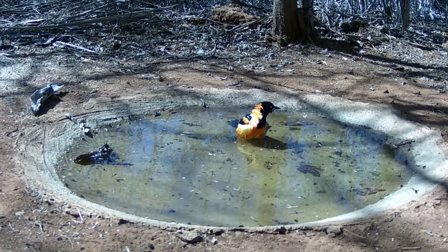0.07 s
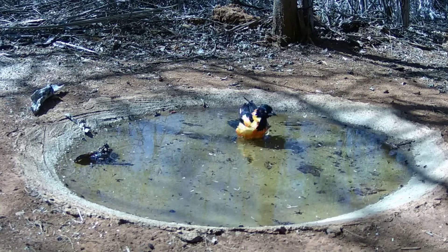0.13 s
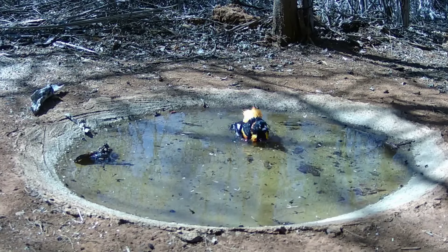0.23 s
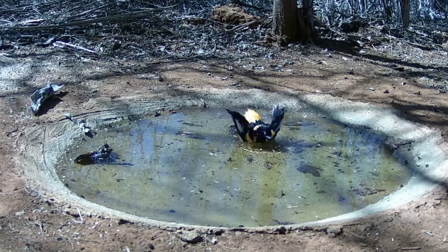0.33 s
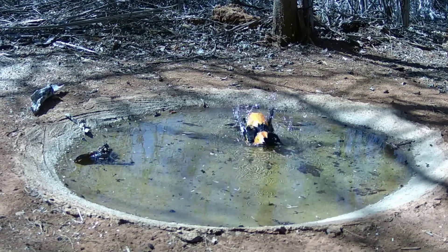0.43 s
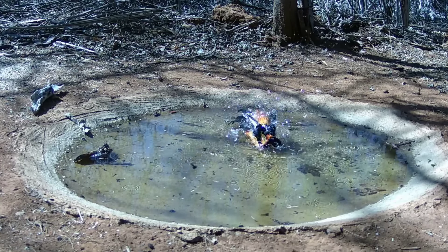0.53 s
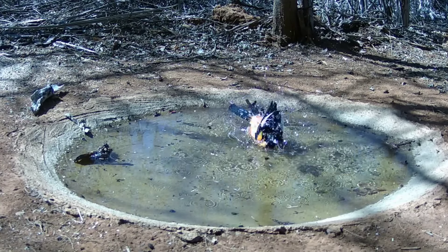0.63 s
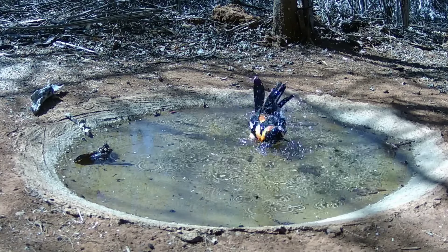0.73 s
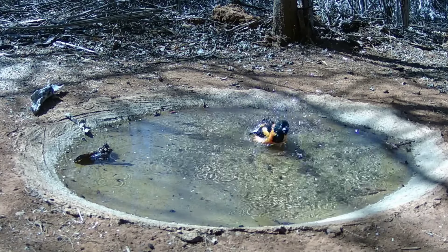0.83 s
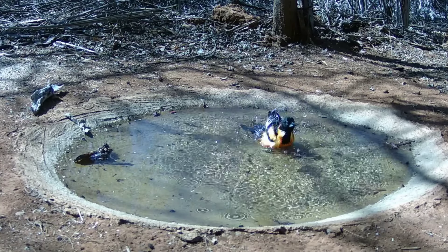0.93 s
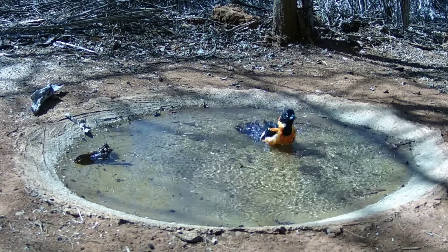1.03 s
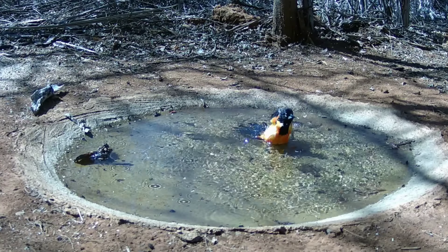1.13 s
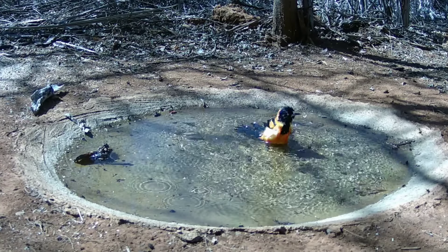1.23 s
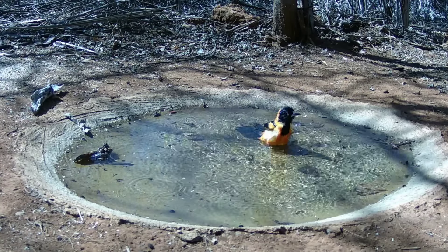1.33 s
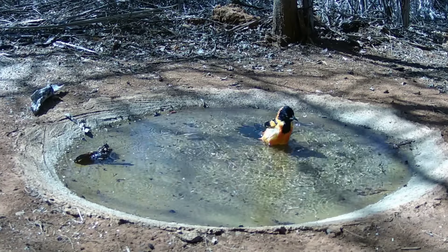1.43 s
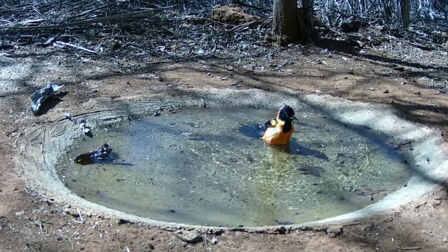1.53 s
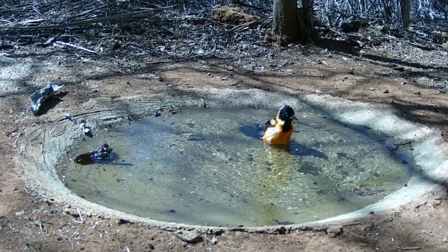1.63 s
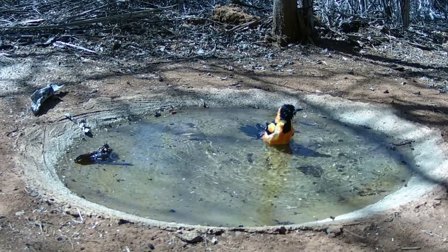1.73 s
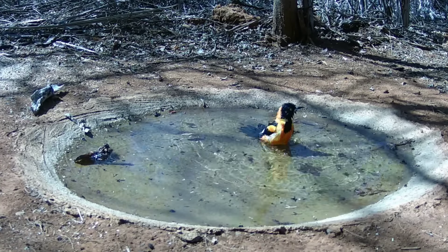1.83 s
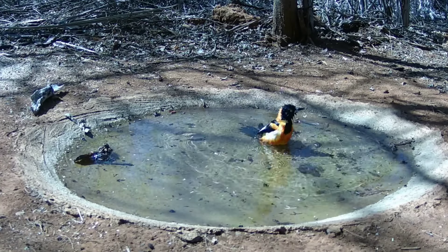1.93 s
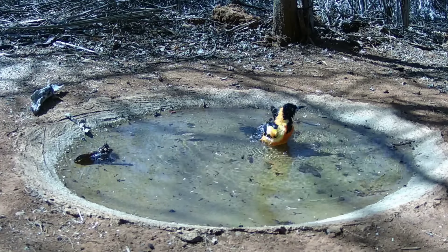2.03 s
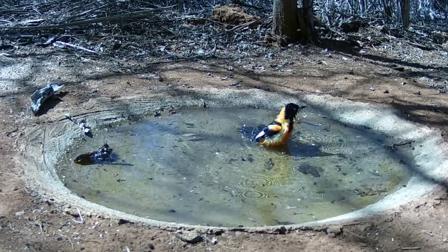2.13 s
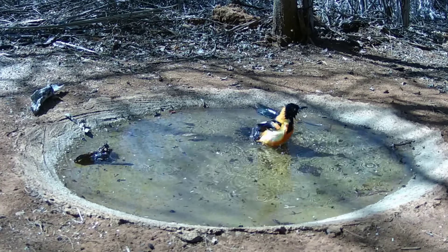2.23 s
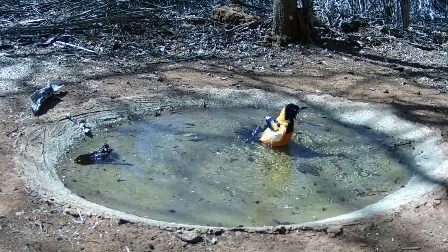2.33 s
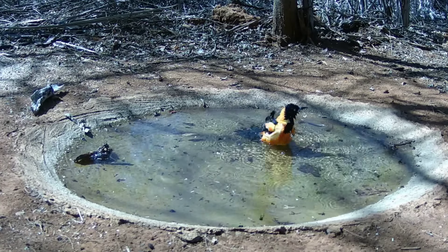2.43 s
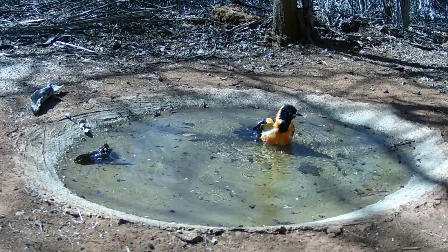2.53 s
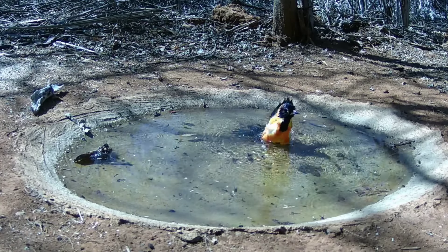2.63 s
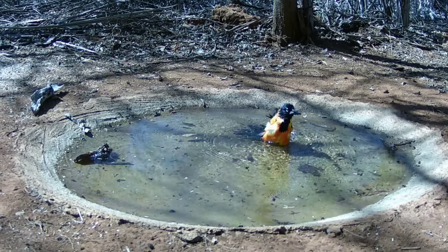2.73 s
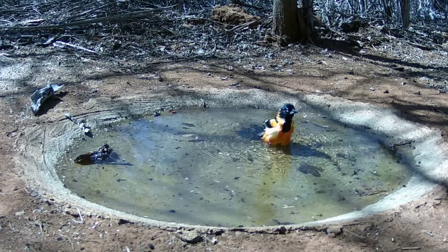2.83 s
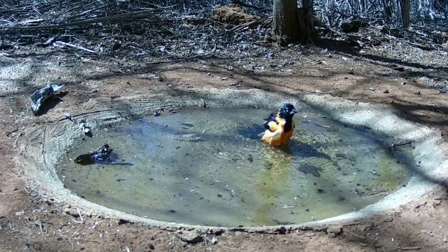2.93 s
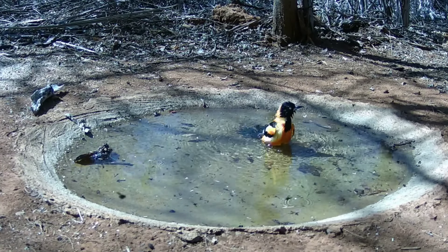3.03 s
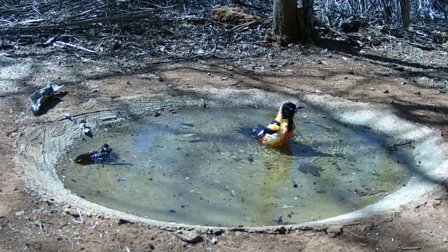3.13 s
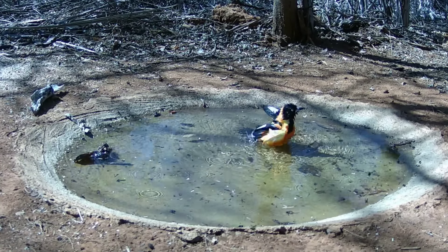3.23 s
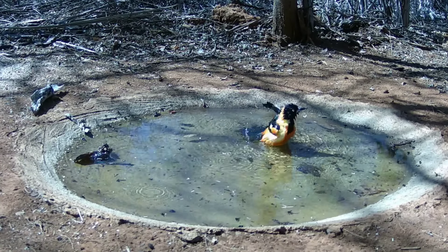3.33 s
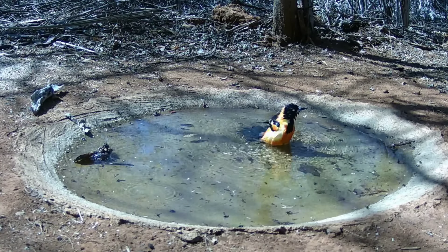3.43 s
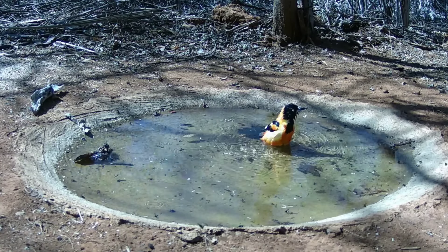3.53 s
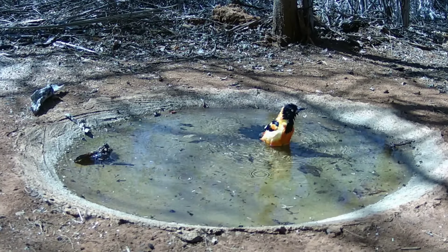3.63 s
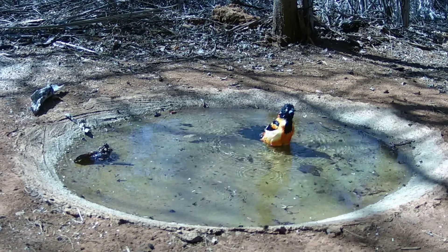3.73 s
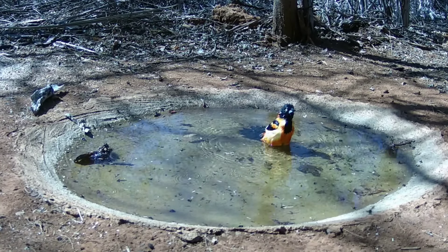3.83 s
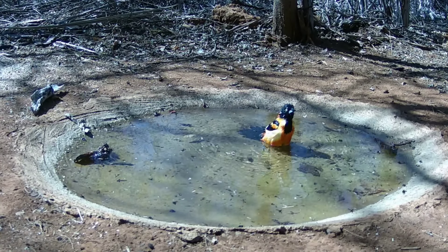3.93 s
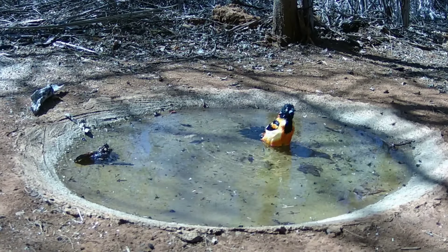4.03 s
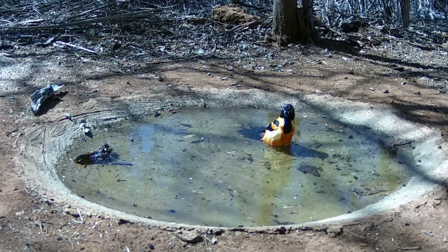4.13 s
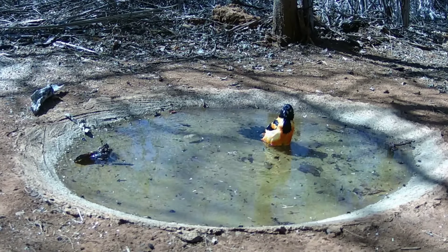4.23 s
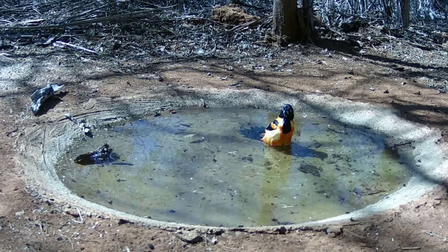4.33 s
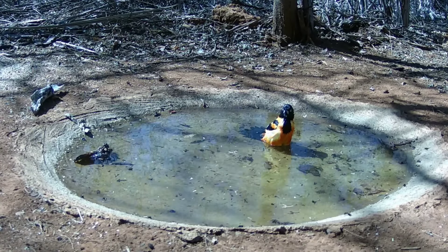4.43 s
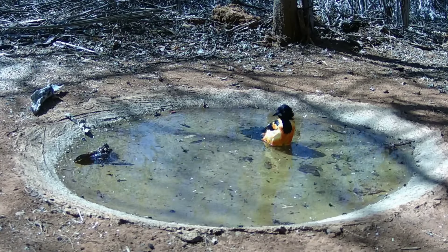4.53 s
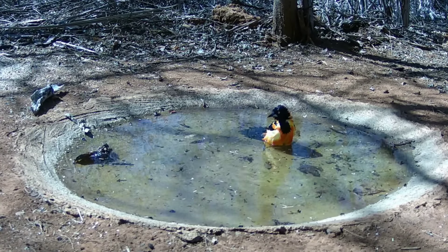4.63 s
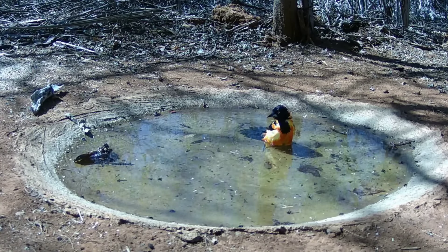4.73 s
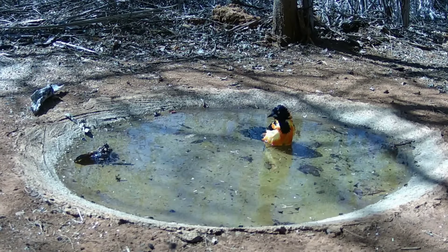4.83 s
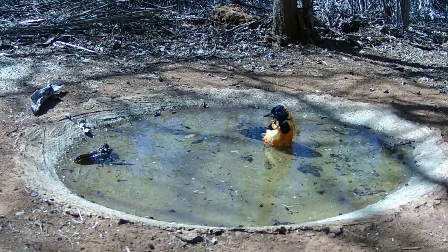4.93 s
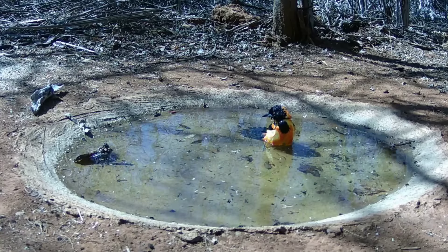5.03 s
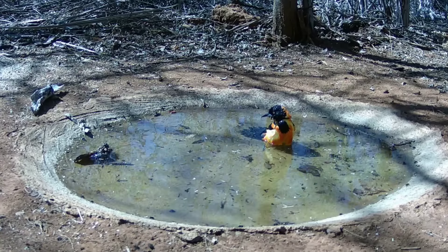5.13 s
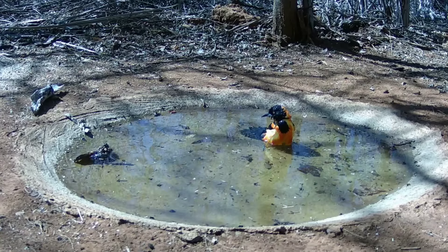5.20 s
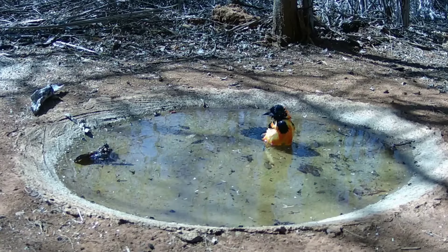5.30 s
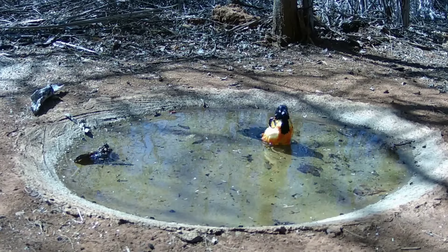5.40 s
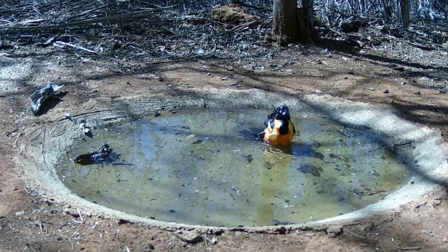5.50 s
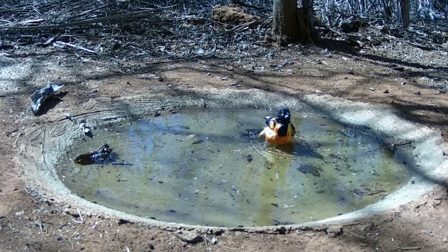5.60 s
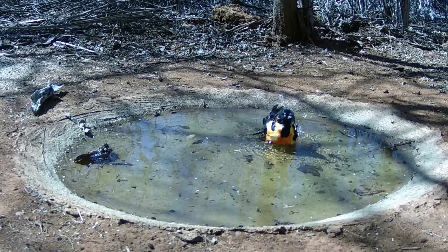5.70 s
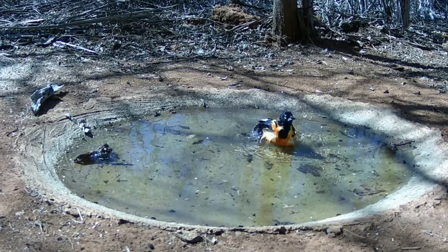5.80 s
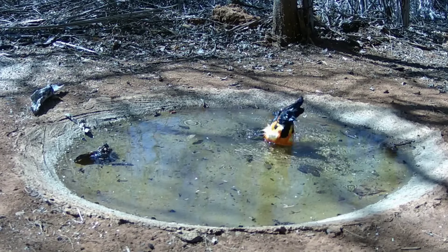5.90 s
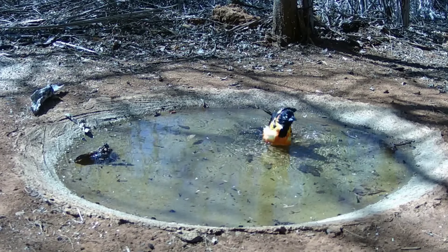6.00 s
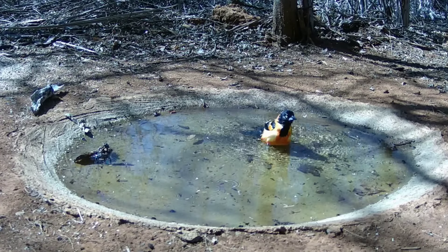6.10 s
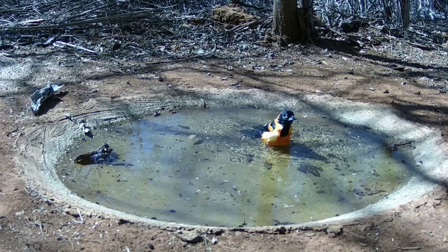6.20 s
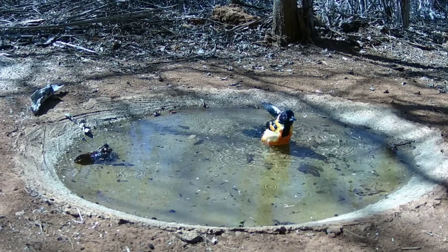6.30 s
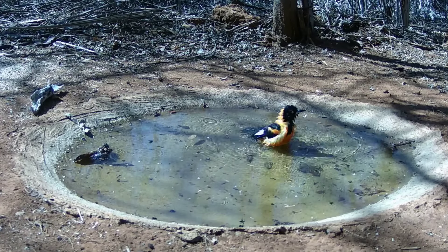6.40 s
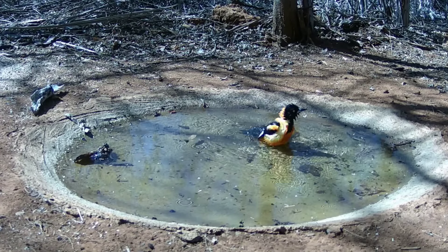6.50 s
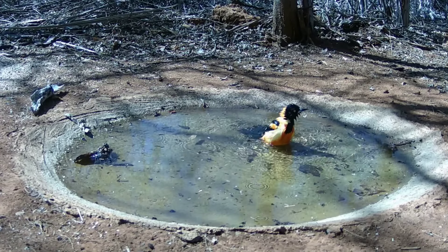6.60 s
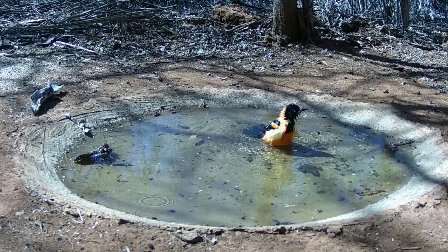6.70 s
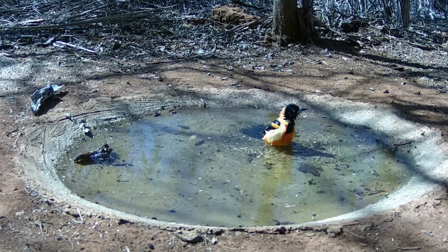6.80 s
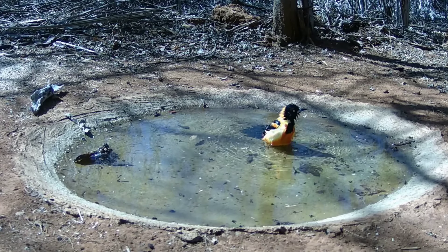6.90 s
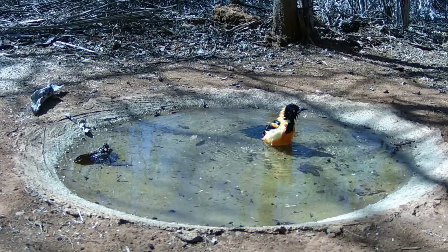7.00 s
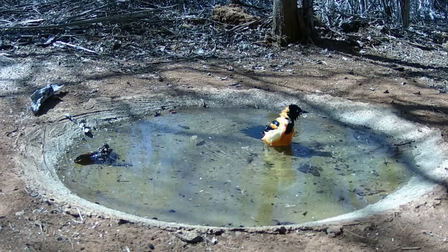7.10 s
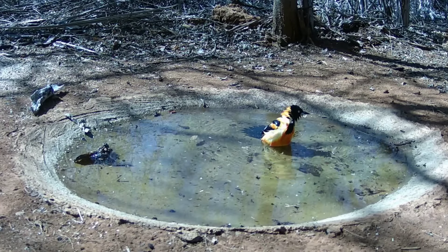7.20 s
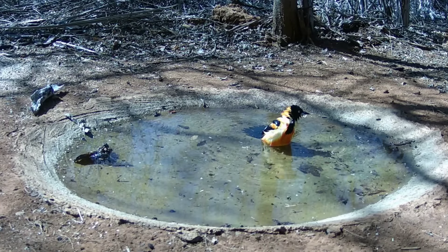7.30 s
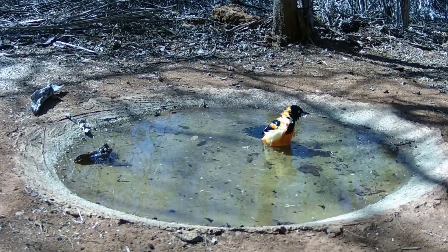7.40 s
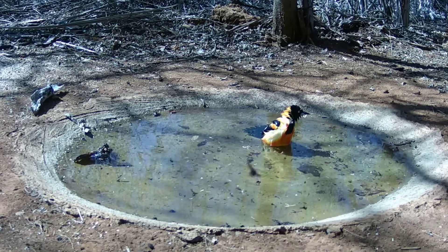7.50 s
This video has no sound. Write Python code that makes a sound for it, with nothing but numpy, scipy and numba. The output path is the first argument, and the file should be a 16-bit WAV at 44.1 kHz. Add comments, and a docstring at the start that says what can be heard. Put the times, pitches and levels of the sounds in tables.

```python
"""Bird bath at a woodland pond

A small bird bathes in the shallows, a couple of metres from a small camera microphone. Its wings slap
the water about fifteen times a second in short bouts, spray patters back, and it chirps once.
Far off, one bird calls in low double notes and another hoots faintly.
Wind buffets the microphone over the hush of the wood."""
import sys
import numpy as np
from scipy import signal
from scipy.fft import rfft, irfft
from scipy.io import wavfile
from scipy.ndimage import uniform_filter1d
from numba import njit

SR = 44100
rng = np.random.default_rng(int(sys.argv[2]) if len(sys.argv) > 2 else 0)


def wav_out(sig):
    """Save sig, one row per channel (or a flat mono array), as 16-bit PCM at SR to the path in sys.argv[1]."""
    wavfile.write(sys.argv[1], SR, np.round(np.clip(np.atleast_2d(sig).T, -1, 1) * 32767).astype(np.int16))


N = 332955


def undb(db):
    return 10 ** (np.asarray(db) / 20)


def level(x, db):
    return x * undb(db) / np.sqrt(np.mean(x ** 2))


def colour(x, points):
    """Causal filter through (freq_hz, gain_db) points; white noise keeps its power."""
    hz, db = np.transpose(points)
    gain = undb(np.interp(np.log(np.arange(2049) * SR / 4096 + 1), np.log(hz), db))
    cepstrum = irfft(np.log(level(gain, 0)))
    cepstrum[1:2048] *= 2  # folded for minimum phase
    cepstrum[2049:] = 0
    return signal.fftconvolve(x, irfft(np.exp(rfft(cepstrum))))[:len(x)]


@njit
def lowpass(x, hz, damp):
    """State-variable low-pass whose edge moves."""
    y, band_state, low_state = np.empty(len(x)), 0., 0.
    for i in range(len(x)):
        g = np.tan(np.pi * hz[i] / SR)
        band = (band_state + g * (x[i] - low_state)) / (1 + g * (g + damp))
        y[i] = low_state + g * band
        band_state, low_state = 2 * band - band_state, 2 * y[i] - low_state
    return y


def wander(per_s):
    """Random steps, smoothed twice; spread near 1."""
    hold = int(SR / per_s)
    steps = np.repeat(rng.standard_normal(N // hold + 1), hold)
    return 1.1 * uniform_filter1d(uniform_filter1d(steps, hold), hold)[:N]


def echo(x, t60_s, db):
    """Trunks and ground scatter a sound into a fading noise tail."""
    t = np.arange(SR // 2) / SR
    tail = rng.standard_normal(len(t)) * np.exp(-np.log(1000) * t / t60_s)
    return x + undb(db) * signal.fftconvolve(x, tail / np.sqrt(np.sum(tail ** 2)))[:N]


def bubble(hz, cycles, glide, n):
    """A trapped bubble rings down 60 dB in about `cycles` and rises in pitch near the surface."""
    turns = hz * np.arange(n) / SR
    envelope = (1 - np.exp(-turns / 0.4)) * np.exp(-np.log(1000) * turns / cycles)
    return envelope * np.sin(2 * np.pi * turns * (1 + glide * turns / cycles))


def fizz(each_per_s, cycles, scatter_db, low_hz, octaves):
    """A cloud of small bubbles in 18 sizes, each size ringing at random moments."""
    out = np.zeros(N)
    for hz in low_hz * 2 ** np.linspace(0, octaves, 18):
        births = rng.random(N) < each_per_s / SR
        strength = undb(scatter_db * np.minimum(rng.exponential(size=N), 1.5))
        out += signal.oaconvolve(births * strength, bubble(hz, cycles, glide=0.1, n=SR // 30))[:N]
    return level(out, 0)


# The wood all around the pond: freq_hz, gain_db
HUSH_SPECTRUM = [(41, -18), (60, 2), (110, -3.5), (345, -14), (480, -15.5), (790, -20.5), (1420, -22.5),
                 (2600, -30), (3400, -36), (4700, -46.5), (7130, -38), (8720, -48.5)]
def wood_hush():
    """Leaves and distance: a smooth hush that swells a little."""
    hush = colour(rng.standard_normal(N), HUSH_SPECTRUM)
    swell_db = 0.89 * wander(1.614) + 0.79 * wander(13)
    return level(hush * undb(swell_db), db=-68)


# The faintest bird, off in the wood: start_s, length_s, pitch_hz, level_db
HOOTS = [(1.46, 0.13, 456, -78.5), (1.698, 0.083, 446, -75), (2.012, 0.071, 455, -74),
         (3.67, 0.13, 471, -76), (5.137, 0.068, 500, -75.5), (6.335, 0.08, 459, -77)]
def hooting_bird():
    """Soft single notes: plain tones that swell and fade."""
    t, out = np.arange(N) / SR, np.zeros(N)
    for start, length, hz, db in HOOTS:
        arch = np.sin(np.pi * np.clip((t - start) / length, 0, 1))
        out += np.sqrt(2) * undb(db) * arch * np.sin(2 * np.pi * hz * t)
    return out * undb(2.0 * wander(37))


# A bird far from the pond, the second note of each pair: middle_s, pitch_hz, level_db
COOS = [(0.224, 479, -63), (.507, 479, -64), (3.378, 466, -65.5), (3.649, 487, -63), (3.902, 504, -61),
        (4.148, 518, -60.5), (4.4, 515, -59.5), (4.683, 511, -60.5), (4.978, 508, -60.5),
        (5.315, 493, -61.5), (5.74, 493, -61)]
def cooing_bird(note_s=0.026, sag=0.16, octave_db=-10):
    """Pairs of short hollow notes whose pitch arches and sags at both ends."""
    out, n = np.zeros(N), int(note_s * SR)
    u = np.linspace(-1, 1, n)
    first_notes = [(s - 0.041, hz * 0.915, db - 2.5) for s, hz, db in COOS]  # earlier, lower, softer
    for middle, hz, db in first_notes + list(COOS):
        phase = 2 * np.pi * np.cumsum(hz * (1 - sag * u ** 2)) / SR
        tone = np.sin(phase) + undb(octave_db) * np.sin(2 * phase)
        i = int(middle * SR) - n // 2
        out[i:i + n] += np.sqrt(2) * undb(db) * (1 - u ** 2) * tone
    return echo(out, t60_s=0.24, db=-15)


# Gusts right on the microphone: start_s, length_s, level_db
GUSTS = [(0.971, 0.54, -37.5), (1.759, .13, -47.5), (2.23, 0.49, -57), (2.842, 0.26, -52.5),
         (5.641, 0.57, -53.5)]
# Lone eddies that pull the diaphragm once: middle_s, peak_db
PUFFS = [(1.582, -38.5), (1.69, -47.5), (1.977, -47), (2.741, -48.5), (3.859, -45.5), (5.129, -48),
         (5.364, -43), (5.478, -46)]
def wind(calm_db=-64.5, sag_db_per_s=5, edge_s=0.026, rumble_hz=65.8, octaves_per_db=0.018, puff_s=0.01):
    """Eddies buffet the diaphragm; faster air carries the rumble higher."""
    t, db = np.arange(N) / SR, np.full(N, calm_db)
    for start, length, gust_db in GUSTS:
        db = np.where((t > start) & (t < start + length), gust_db - sag_db_per_s * (t - start), db)
    db = uniform_filter1d(db, int(edge_s * SR))
    hz = rumble_hz * 2 ** (octaves_per_db * (db - db.max()))
    eddies = signal.sosfilt(signal.butter(1, 12., "high", fs=SR, output="sos"), rng.standard_normal(N))
    rumble = eddies * undb(2.0 * wander(11))
    for ratio, damp in (0.71, 1.6), (1.2, 1.8), (0.84, 1.3):
        rumble = lowpass(rumble, ratio * hz, damp)
    puffs = sum(undb(peak_db) * np.exp(-((t - s) / puff_s) ** 2) for s, peak_db in PUFFS)
    return undb(db) * level(rumble, 0) - puffs


# The bather's feathers, a couple of metres away: freq_hz, gain_db
RATTLE_SPECTRUM = [(350, -21), (650, 3.5), (2000, 0), (2800, -25), (4000, -27)]
def feather_rattle(start_s=3.5445, knocks_per_s=335, count=4):
    """An even run of quick dull knocks as the feathers shake."""
    knocks = np.zeros(N)
    times = start_s + np.arange(count) / knocks_per_s
    knocks[(times * SR).astype(int)] = undb(-39.5)
    return colour(knocks, RATTLE_SPECTRUM)


# The bather's chirp from the shallows, one list a note: time_s, pitch_hz, level_db
CHIRP_NOTES = [
    [(6.016, 1045, -96), (6.024, 1198, -55), (6.035, 2016, -77), (6.045, 2364, -58), (6.056, 2194, -67),
     (6.064, 2640, -55), (6.078, 3340, -69.5), (6.097, 3000, -64), (6.112, 2950, -84)],
    [(6.102, 2460, -71), (6.108, 2407, -69), (6.125, 2020, -57.5), (6.142, 1902, -49), (6.165, 1898, -48.5),
     (6.195, 1940, -46), (6.213, 1938, -53), (6.222, 1954, -58.5), (6.23, 1980, -93)],
]
# The chirp's overtones 2-4, one row a note; the top two on the loud second note (5 and 6)
# are faint recorder distortion: relative_db
OVERTONES_AND_DISTORTION = [(-6.5, -21, -34), (-19.5, -36.5, -55, -15, -19)]
# The microphone's housing dips, then peaks: freq_hz, gain_db
MIC_HOUSING = [(3800, -12.5), (4800, -7), (6200, 1), (7200, 17), (9000, -11)]
def chirp():
    """Two slurred near-sine notes with a slight tremble; the second distorts faintly in the recorder."""
    out, tremble = np.zeros(N), undb(1.4 * wander(160))
    for note, upper_db in zip(CHIRP_NOTES, OVERTONES_AND_DISTORTION):
        times, hz, db = np.transpose(note)
        i = np.arange(int(times[0] * SR), int(times[-1] * SR))
        hz, db = (uniform_filter1d(np.interp(i / SR, times, curve), SR // 250) for curve in (hz, db))
        phase = 2 * np.pi * np.cumsum(hz) / SR
        upper = sum(undb(relative_db + np.interp(k * hz, *np.transpose(MIC_HOUSING))) * np.sin(k * phase)
                    for k, relative_db in enumerate(upper_db, start=2))
        out[i] += np.sqrt(2) * undb(db) * (np.sin(phase) + upper)
    return echo(out * tremble, t60_s=0.183, db=-23.5)


# Thrown water falling back around the bird, one list a bout: time_s, level_db
SPRAY_BOUTS = [
    [(.36, -99), (.48, -82), (.8, -67.5), (.96, -70.5), (1.1, -72.5), (1.25, -80), (1.42, -98)],
    [(2, -92.5), (3.6, -85.5)],
    [(5.66, -100), (5.8, -80), (6.05, -75), (6.17, -84)],
]
# The tick of drops on the pond: freq_hz, gain_db
DROP_SPECTRUM = [(400, -37.5), (800, -17.5), (2700, -8), (4900, -25), (7200, 0.5), (8700, -27.5)]
def spray(froth):
    """Many drops tick on the surface, with a froth of longer-ringing bubbles."""
    t, gain = np.arange(N) / SR, np.zeros(N)
    for bout in SPRAY_BOUTS:
        times, db = np.transpose(bout)
        gain += np.interp(t, times, undb(db), left=0, right=0)
    drops = fizz(each_per_s=40, cycles=4.0, scatter_db=9, low_hz=810, octaves=3.4)
    ticks = level(colour(drops, DROP_SPECTRUM), db=-4.0)
    return uniform_filter1d(gain, SR // 50) * (ticks + undb(-5.5) * froth)


# Single drops landing near the bird: start_s, level_db, pitch_hz
DRIPS = [(0.534, -55, 2420), (0.649, -42.5, 954), (.709, -52, 1360), (0.734, -53, 2680),
         (.762, -47.5, 2480), (1.048, -50.5, 3520), (1.061, -40.5, 2590), (1.107, -62, 3750),
         (1.312, -52, 3300), (2.936, -51, 2060), (3.209, -52.5, 2580), (3.566, -52.5, 2370),
         (5.588, -65, 2480), (5.758, -42, 1680), (5.9298, -44, 2480)]
def drips(ring_s=0.013):
    """Each drop traps one bubble, which rings briefly."""
    out, n = np.zeros(N), SR // 10
    for start, db, hz in DRIPS:
        i = int(start * SR)
        out[i:i + n] += undb(db) * bubble(hz, cycles=ring_s * hz, glide=0.046, n=n)
    return out


# Wing meets water, two metres or so from the microphone: start_s, level_db, treble_relative_db, hollow_hz
SLAPS = [(0.373, -48, -23, 1170), (0.432, -42.5, -18, 1670), (0.476, -48.5, -15, 2630),
         (0.503, -44, -21.5, 1100), (0.554, -43.5, -19, 1920), (0.584, -48.5, -16, 2600),
         (0.627, -48.5, -13.5, 2460), (0.647, -49.5, -17, 1060), (0.728, -42.5, -21, 1560),
         (0.762, -50.5, -10, 2540), (0.812, -45.5, -5, 3020), (0.849, -53, -22, 1400),
         (0.924, -41, -16, 1590), (1, -61, -24, 1290), (1.045, -50.5, -14, 2680), (1.062, -43, -15, 2680),
         (1.074, -42.5, -35, 1510), (1.141, -51.5, -15, 1270), (1.166, -49, -21, 2900),
         (1.206, -50.5, -18, 2460), (1.231, -45, -13.5, 1960), (1.309, -43.5, -21.5, 3170),
         (1.38, -53, -24, 2400), (1.387, -49, -24, 1480), (2.05, -51.5, -25, 1670),
         (2.124, -47.5, -24, 736), (2.194, -38, -27.5, 1580), (2.258, -38, -12.5, 1810),
         (2.325, -36, -26, 1310), (2.393, -34.5, -26, 1300), (2.499, -53, -26, 766),
         (2.584, -51, -44, 1290), (2.655, -43, -21, 1400), (2.696, -59, -5, 1080),
         (2.725, -37.5, -28, 2140), (2.7295, -46.5, -14, 1460), (2.797, -42.5, -18.5, 2510),
         (2.8031, -50.5, -19, 1000), (2.872, -40.5, -22, 2520), (2.971, -47.5, -22, 1370),
         (3.162, -50, -24, 1400), (3.242, -45, -24, 1310), (3.324, -43.5, -19, 1240),
         (3.402, -38.5, -25, 690), (3.454, -52.5, -14, 1020), (3.473, -39, -19, 1270),
         (5.664, -52.5, -41, 1130), (5.734, -45, -20, 1340), (5.790, -43, -24, 2420),
         (5.7938, -42.5, -19, 1280), (5.858, -39.5, -20, 1400), (5.923, -35, -18, 1480),
         (5.991, -40, -20, 2490), (5.996, -43.5, -17, 1310), (6.066, -38, -22, 2610),
         (6.112, -56, -19, 1930), (6.145, -40.5, -21.5, 1830), (6.457, -55, -27, 710),
         (6.542, -42, -31, 2160), (6.615, -44.5, -22, 710), (6.682, -38.5, -20, 1383),
         (6.767, -46.5, -20.5, 680)]
# The light touch that leads each slap, set per bout: bout_start_s, ahead_s, relative_db
BOUT_TOUCHES = [(0, 0.025, -17.5), (2, 0.021, -17), (5.5, .0215, -7), (6.4, 0.017, -14)]
def wing_strokes(touch_treble_db=-16, touch_hz=1220, scatter_db=2.5, scatter_octaves=0.27):
    """Every slap and the lighter touch that leads it; the second wing of a close pair has none."""
    bout_starts, ahead_s, relative_db = np.transpose(BOUT_TOUCHES)
    starts = [slap[0] for slap in SLAPS]
    chances = rng.standard_normal((len(SLAPS), 2))
    touches = []
    for (start, db, _, _), gap_s, (force, pitch) in zip(SLAPS, np.diff(starts, prepend=0), chances):
        if gap_s > 0.009:
            bout = np.searchsorted(bout_starts, start) - 1
            touch_db = db + relative_db[bout] + scatter_db * force
            hz = touch_hz * 2 ** (scatter_octaves * pitch)
            touches.append((start - ahead_s[bout], touch_db, touch_treble_db, hz))
    return list(SLAPS) + touches


# The body of the water under a slap, and the thin sheet torn off it: freq_hz, gain_db
BODY_SPECTRUM = [(88, -30), (150, 1.5), (650, -3), (950, -5.5), (1350, -1.5), (2400, -3.5), (3500, -12.5),
                 (5000, -31.5), (6500, -52.5)]
SHEET_SPECTRUM = [(3500, -36), (5200, -12.5), (7300, 1.5), (8900, -21)]
def wing_slaps(froth, rise_s=0.001098, crack_t60_s=0.01, plough_s=0.0095, shed_s=0.013):
    """Each slap cracks in the water's body and a tearing sheet, rings a brief hollow and churns froth."""
    body, sheet, churn, hollows, body_hits, sheet_hits = np.zeros((6, N))
    n = SR // 10
    t = (np.arange(n) - n // 4) / SR
    crack = np.exp(np.where(t < rise_s, (t - rise_s) / rise_s, -np.log(1000) * (t - rise_s) / crack_t60_s))
    # the feathers plough water before the slap and shed it afterwards
    wash = undb(-18.5) * np.exp(-(t / np.where(t < 0, plough_s, shed_s)) ** 2)
    for start, db, treble_db, hz in wing_strokes():
        i = int(start * SR)
        span = slice(i - n // 4, i - n // 4 + n)
        body[span] += undb(db) * (crack + 0.76 * wash)
        churn[span] += undb(db) * wash
        sheet[span] += undb(db + treble_db) * (crack ** 2 + wash)
        hollows[i:i + n] += undb(db - 9) * bubble(hz, cycles=0.021 * hz, glide=0.027, n=n)
        landing = int((start + rise_s) * SR)  # the flat of the wing lands
        body_hits[landing] += undb(db)
        sheet_hits[landing] += undb(db + treble_db)
    grain = undb(3.0 * wander(1200))  # the water breaks up unevenly
    body = colour(body * grain * rng.standard_normal(N) + undb(10.5) * body_hits, BODY_SPECTRUM)
    body += undb(-1.0) * churn * froth
    sheet = colour(sheet * grain * rng.standard_normal(N) + undb(9.5) * sheet_hits, SHEET_SPECTRUM)
    return undb(-10) * body + undb(-1.5) * sheet + hollows


def scene():
    """The bather close by and the wood behind it, in mono."""
    froth = fizz(each_per_s=29.0, cycles=11.0, scatter_db=5.5, low_hz=1137, octaves=1.65)
    splashes = echo(wing_slaps(froth) + drips(), t60_s=0.16, db=-15.5)
    bather = splashes + spray(froth) + chirp() + feather_rattle()
    return (bather + cooing_bird() + wind() + wood_hush() + hooting_bird())[None]


def record(dry):
    """The microphone ends below 9 kHz; faint electronic hiss reaches higher and swells with bright sounds."""
    mic_top_hz, hiss_top_hz, hiss_db, floor_db = 8640, 15700, -94, -104
    heard = signal.sosfilt(signal.ellip(6, .5, 21, mic_top_hz, fs=SR, output="sos"), dry)
    bright = signal.sosfilt(signal.butter(6, 5000, "high", fs=SR, output="sos"), heard)
    swell = undb(-16.5) * uniform_filter1d(np.abs(bright), SR // 30)
    hiss = np.hypot(undb(hiss_db), swell) * rng.standard_normal(dry.shape)
    heard = signal.sosfilt(signal.ellip(8, .2, 70, hiss_top_hz, fs=SR, output="sos"), heard + hiss)
    return heard + undb(floor_db) * rng.standard_normal(dry.shape)


dry = scene()
out = record(dry)
wav_out(out)
```